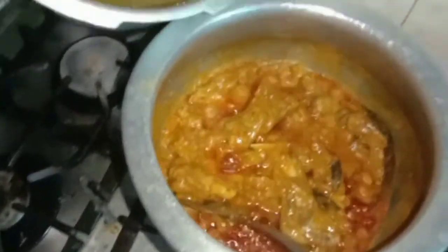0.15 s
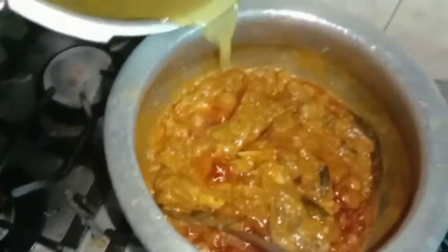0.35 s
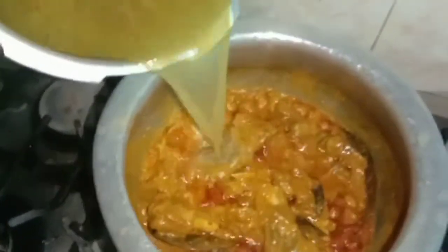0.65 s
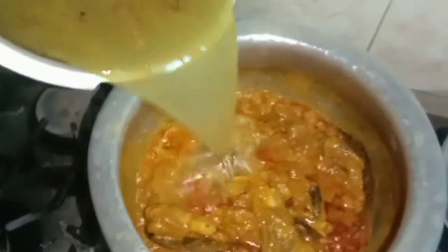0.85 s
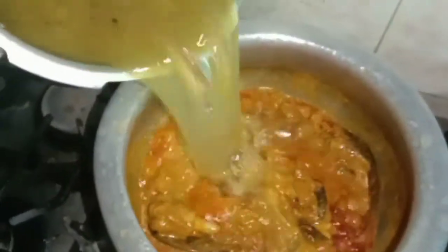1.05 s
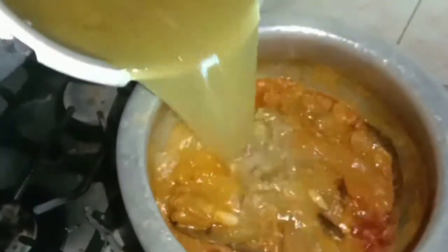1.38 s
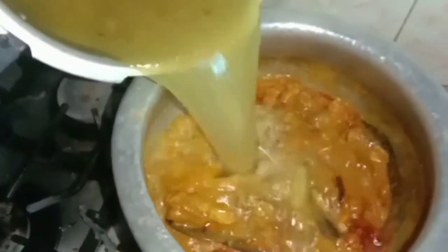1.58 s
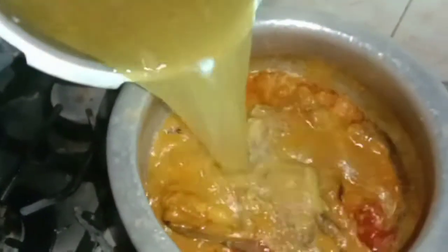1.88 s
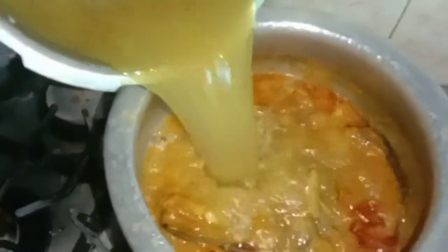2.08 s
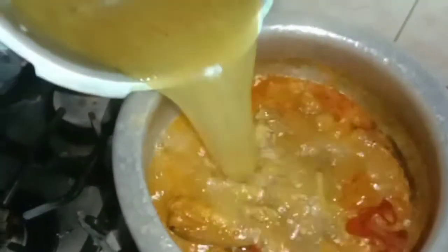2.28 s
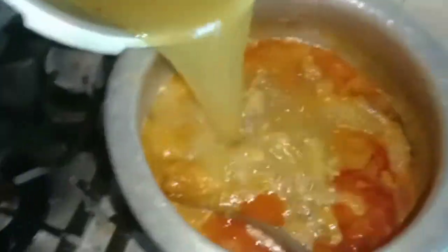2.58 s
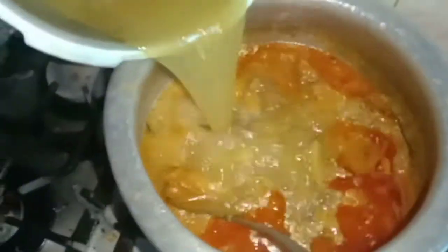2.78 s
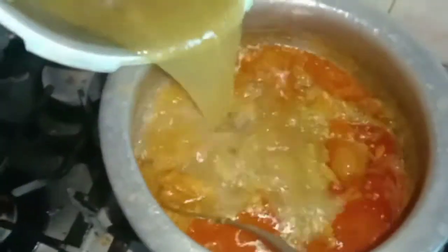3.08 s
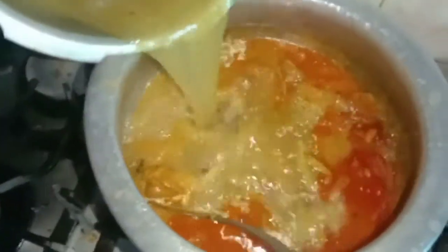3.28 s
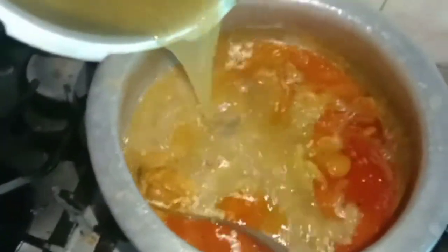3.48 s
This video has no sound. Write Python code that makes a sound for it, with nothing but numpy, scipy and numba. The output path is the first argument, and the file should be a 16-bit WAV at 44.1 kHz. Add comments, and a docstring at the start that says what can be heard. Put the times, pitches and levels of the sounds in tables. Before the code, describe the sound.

Broth pours into a metal pot of hot gravy, close to the microphone in a kitchen. It patters and sizzles, swells with popping bubbles, then eases off as something knocks against the cookware, which rings briefly.

```python
"""From the start, hot gravy sizzles in a metal pot close to the microphone; near 0.8 s broth begins to pour in.
Small bubbles, each a damped oscillator, patter and fizz, and pockets in the gravy open with falling tones.
After a second the stream swells; larger bubbles pop, and the air in the pot resonates, less as it fills. Soft
low rumbles come and go throughout. Near 3.5 s the pour eases off, and something knocks against the cookware,
whose metal rings in its natural modes."""
import sys
import numpy as np
from scipy import signal
from scipy.fft import rfft, irfft
from scipy.io import wavfile
from scipy.ndimage import uniform_filter1d
from numba import njit

SR = 44100
rng = np.random.default_rng(int(sys.argv[2]) if len(sys.argv) > 2 else 0)


def to_wav(s):
    """Save 16-bit WAV."""
    ch = np.atleast_2d(s).T  # columns
    pcm = np.round(np.clip(ch, -1, 1) * 32767)  # PCM
    wavfile.write(sys.argv[1], SR, pcm.astype(np.int16))


N = 160965
TIME = np.arange(N) / SR

# Levels are relative within each table.
# Spectrum of the kitchen noise (frequency [Hz], level [dB])
KITCHEN_SPECTRUM = [(15, -44), (25, -2), (107, 6), (156, -3.5), (201, 2.5), (335, -4), (509, -0.5),
                    (741, -4), (900, -8.5), (1170, -60), (1980, -120)]
# Low rumbles (centre time [s], duration [s], level [dB])
RUMBLES = [(0.01, 0.064, -47.5), (0.184, 0.16, -45.5), (1.727, 0.034, -47), (1.869, 0.12, -44),
           (2.82, 0.13, -48.5), (2.992, 0.32, -51.5), (3.538, 0.063, -36.5)]
# Air modes of the pot (frequency [Hz], bandwidth [Hz], level [dB])
AIR_MODES = [(519, 66, -60.5), (976, 73, -59.5), (1189, 55, -50.5), (1427, 230, -59)]
# Gulps that swell one air mode (centre time [s], duration [s], frequency [Hz], level [dB])
GULPS = [(0.257, 0.15, 503, -45.5), (0.358, 0.12, 220, -53), (0.467, 0.089, 527, -47.5),
         (0.749, 0.049, 1157, -39.5), (1.315, 0.046, 975, -39), (1.482, 0.094, 517, -43),
         (1.526, 0.065, 983, -35), (1.803, 0.048, 1180, -44), (1.613, 0.045, 972, -39),
         (2.084, 0.044, 519, -40.5), (2.213, 0.13, 530, -46.5), (2.047, 0.1, 994, -42),
         (2.212, 0.1, 1190, -44.5), (2.409, 0.041, 993, -40.5), (2.946, .06, 1223, -45.5),
         (3.38, 0.1, 1250, -47)]
# Pockets opening in the gravy (time [s], decay [s], start pitch [Hz], end pitch [Hz], level [dB])
GLOOPS = [(0.311, .028, 1770, 1520, -25), (.335, .018, 1380, 1280, -29), (.456, .018, 2480, 2080, -32),
          (0.868, 0.026, 2520, 1950, -27)]
# Single bubbles (time [s], level [dB], frequency [Hz])
POPS = [(0.1359, -12, 3100), (0.373, -20, 2800), (0.6237, -9.5, 5630), (0.752, -9.5, 3130),
        (0.914, -16.5, 2720), (1.0007, -8.5, 3240), (1.0934, -11, 5470), (1.2309, -6.5, 3340),
        (1.302, -4, 5700), (1.325, -2.5, 5750), (1.3515, -7, 5470), (1.4633, -7.5, 5750),
        (1.6355, -5, 5900), (1.7125, -8.5, 3350), (1.8646, -14, 2600), (1.9314, -6.5, 6230),
        (1.9654, -7, 2790), (1.9944, -8.5, 3340), (2.0792, -9, 3240), (2.1053, -12, 3220),
        (2.1885, -14, 3330), (2.2191, -3.5, 6250), (2.2667, -11, 3160), (2.3781, -2, 6040),
        (2.3855, -3, 6470), (2.4492, -11, 2670), (2.4772, -12, 2760), (2.5645, -10.5, 3300),
        (2.602, -10, 6070), (2.6957, -4, 3410), (2.8647, -13, 2930), (2.8987, -13, 2745),
        (3.056, -13, 2520), (3.071, -10, 3100), (3.0978, -11.5, 2750), (3.212, -11.5, 3110),
        (3.2526, -16, 2840), (3.4124, -8, 5930), (3.4183, -10.5, 2860), (3.493, -5, 5170)]  # small bubbles and spits
PLOPS = [(.234, -32, 1270), (.733, -31.5, 1500), (.882, -27.5, 2020), (2.093, -28, 2110),
         (2.378, -23.5, 2114), (2.441, -27, 1864)]  # larger bubbles
SPRAY_TICKS = [(0.188, -18, 13800), (1.4623, -15, 14500), (1.5444, -17, 13900), (1.565, -4.5, 13900),
               (3.0555, -12.5, 13300)]
# Wet splats of gravy (time [s], level [dB], decay [s], share of fine spray [dB])
SPLATS = [(0.184, -30, 0.009, 6), (.311, -26, 0.011, -20), (.752, -25, 0.012, -16), (1.279, -23, 0.0045, 3),
          (1.463, -22, .004, -7), (1.635, -25, .005, -10), (1.9075, -18.5, 0.0035, -9),
          (2.217, -31, 0.0076, -12), (2.378, -12.5, 0.003, -16), (2.3865, -16, 0.004, -16),
          (2.710, -22.5, 0.008, -16)]
# The knock and its rebounds (time [s], level [dB])
IMPACTS = [(3.5452, -2), (3.547, 0.5), (3.552, 0.5), (3.561, -8)]
# Modes of the cookware (frequency [Hz], level [dB], 60 dB decay time [s])
METAL_MODES = [(94, -34.5, 0.78), (136, -32.5, 0.47), (184, -28.5, 0.34), (219.6, -23, 0.29),
               (510, -28.5, 0.74), (684, -29, 0.26), (729, -19, 0.12), (1020, -26, 0.41), (1066, -19, 0.17),
               (1138, -23, 0.19), (1265, -24, 0.17), (1387, -29, 0.27), (1624, -28, 0.16),
               (3310, -32.5, .25), (4136, -27, 0.26), (5010, -29, 0.95), (5502, -48, 0.31),
               (6330, -38.5, 0.76), (7900, -44.5, 0.64)]
# Spectra of the transients (frequency [Hz], level [dB])
SPLAT_SPECTRUM = [(400, -30), (1600, -8), (2300, -13), (3200, 11.5), (4300, -2), (5600, 13), (6600, 5),
                  (8500, -11.5), (15000, -29)]
CLUNK_SPECTRUM = [(350, -24), (720, 2), (1150, -6), (1600, -15), (4000, -19), (5600, -9), (9000, -34.5)]
RATTLE_SPECTRUM = [(40, -38), (70, -18), (95, -20), (140, -3), (220, -10), (300, -12), (520, -4.5),
                   (750, -3.5), (880, -18), (1080, -3.5), (1350, -11), (1480, -15), (1620, -10.5),
                   (1900, -17.5), (2900, -18.5), (4200, -25.5), (5500, -18), (7000, -41)]
# Spectra of the bubble swarms (frequency [Hz], level [dB])
BURBLE_SPECTRUM = [(300, -16), (750, -16), (950, -1), (1200, 0), (1480, 3.5), (1700, -16), (1950, 1),
                   (2500, -23.5)]
SPLASH_SPECTRUM = [(900, -20), (1600, -10.5), (2100, -1.5), (2500, -3.5), (3300, -12), (4300, -5.5),
                   (5000, 1), (7000, -37)]
PATTER_SPECTRUM = [(1200, -21), (2100, -42), (2350, -4), (2620, 2.5), (2900, -3.5), (3200, 0), (3600, -4.5),
                   (3950, -3.5), (4300, -13.5), (5200, -30)]
SIZZLE_SPECTRUM = [(2500, -35), (4300, -7), (4900, -5), (5500, 0), (6200, -0.5), (7000, -4.5), (8000, -16),
                   (9500, -34), (13000, -29)]
FIZZ_SPECTRUM = [(4000, -17), (8000, -6), (9400, -12), (11000, -7.5), (13000, -3), (14500, 0.5), (16000, 1)]
# Envelopes of the low burble and of the stream's splash (time [s], level [dB])
BURBLE_LEVELS = [(0, -42.5), (.6, -48), (.75, -49.5), (1.0, -43.5), (1.3, -40), (1.42, -41.5), (1.6, -46),
                 (1.7, -37), (1.9, -50.5), (2.03, -41.5), (2.3, -45.5), (2.8, -46.5), (3.4, -44.5)]
SPLASH_LEVELS = [(0, -58), (.6, -51), (.9, -49), (1.1, -37), (1.3, -31), (1.45, -43.5), (1.7, -39.5),
                 (1.85, -39.5), (2.05, -37), (2.4, -42), (2.7, -44), (3.1, -42.5), (3.3, -61.5),
                 (3.53, -43)]
# Activity in the pot (time [s], patter level [dB], sizzle level [dB], fizz level [dB])
ACTIVITY = [(0.0, -36.5, -37.5, -38), (0.12, -35, -34, -39), (0.55, -38, -37, -42), (0.59, -59, -46.5, -42),
            (0.64, -37.5, -28.5, -36.5), (0.73, -36, -36.5, -37.5), (0.79, -34, -32, -38.5),
            (0.89, -33.5, -34.5, -39), (1.1, -28, -25, -29.5), (1.15, -30.5, -35, -33.5),
            (1.32, -23, -22.5, -30.5), (1.48, -37, -31.5, -34), (1.53, -28.5, -29.5, -35),
            (1.57, -27, -26, -35), (1.65, -26, -27, -32.5), (1.88, -32, -32.5, -31.5),
            (1.91, -28, -31, -34), (2.36, -30, -30.5, -34), (2.4, -32, -34, -33),
            (2.44, -29.5, -34.5, -36.5), (2.55, -30, -34, -39), (2.63, -26, -31.5, -35),
            (3.02, -30.5, -32.5, -37.5), (3.07, -29.5, -28.5, -35), (3.13, -34, -33.5, -38),
            (3.19, -26.5, -31, -34), (3.26, -39.5, -46, -47.5), (3.5, -26, -28.5, -31),
            (3.53, -19.5, -29.5, -29.5)]
# Resonance of the patter, sinking as the pot fills (time [s], frequency [Hz], bandwidth [Hz])
PATTER_RESONANCE = [(0.9, 3350, 1300), (1.2, 3190, 605), (1.75, 3250, 584), (2.3, 3050, 1140),
                    (2.7, 3080, 1200), (3.5, 2650, 1200)]


def amp(db):
    """Amplitude ratio: a factor of ten for every 20 dB."""
    return 10 ** (np.asarray(db) / 20)


def unit(x):
    """Normalisation to an rms of 1."""
    return x / np.sqrt(np.mean(x ** 2) + 1e-20)


def add(mix, start_s, sound):
    """Superposition of a delayed sound on the mix."""
    part = mix[max(round(start_s * SR), 0):][:len(sound)]
    part += sound[:len(part)]


def envelope(table, column=1):
    """Amplitude envelope, interpolated linearly in decibels."""
    rows = np.array(table)
    return amp(np.interp(TIME, rows[:, 0], rows[:, column]))


def swell(centre_s, length_s):
    """Gaussian envelope, length_s wide between its 1/e points."""
    return np.exp(-(2 * (TIME - centre_s) / length_s) ** 2)


def colour(x, spectrum, size=2048):
    """Minimum-phase filter: the phase follows from the Hilbert transform of the log magnitude."""
    hz, db = np.transpose(spectrum)
    f = abs(np.fft.fftfreq(size, 1 / SR))
    gain = amp(np.interp(np.log(f + 1), np.log(hz + 1), db))
    bass_rolloff = np.minimum((f + 1) / (hz[0] + 1), 1)
    log_response = np.conj(signal.hilbert(np.log(gain * bass_rolloff + 1e-5)))
    taps = np.fft.ifft(np.exp(log_response)).real
    return signal.oaconvolve(x, taps)[:len(x)]


def noise(samples, spectrum, size=2048):
    """Filtered white noise takes on the spectrum of its filter; rms 1."""
    return unit(colour(rng.standard_normal(samples), spectrum, size))


def resonance(hz, width_hz):
    """A resonance driven by turbulence responds with a narrow band of noise; rms 1."""
    f = np.fft.rfftfreq(N, 1 / SR)
    return unit(irfft(rfft(rng.standard_normal(N)) / (1 + ((f - hz) / width_hz * 2) ** 4), N))


@njit
def leaky_sum(x, pole):
    """Leaky integration: a one-pole low-pass whose memory varies with time."""
    out = x.copy()
    for i in range(1, len(x)):
        out[i] += pole[i] * out[i - 1]
    return out


def moving_resonance(x, hz, width_hz):
    """Heterodyne resonator of constant noise power: shift down, low-pass, shift back."""
    carrier = np.exp(2j * np.pi * np.cumsum(hz) / SR)
    pole = np.exp(-np.pi * width_hz / SR)
    return (carrier * leaky_sum(np.sqrt(1 - pole ** 2) * x / carrier, pole)).real


def reflections(x, t60, wet_db, gap_s, count=8):
    """Echo paths depend on source position: moving splashes crossfade between impulse responses."""
    t, wet = TIME[:SR // 4], np.zeros(N)
    position = TIME / 0.02  # the next pattern every 20 ms
    for k in range(count):
        share = np.cos(np.pi / 2 * np.minimum(abs((position - k) % count - 1), 1))
        tail = rng.standard_normal(len(t)) * amp(-60 * t / t60) * (t > gap_s)
        wet += signal.oaconvolve(x * share, tail / np.linalg.norm(tail))[:N]
    return (x + amp(wet_db) * wet) / np.sqrt(1 + amp(wet_db) ** 2)


def in_pot(x, pot_db, room_db):
    """Reverberation in series: first between the pot walls, then in the kitchen."""
    pot = reflections(x, t60=0.022, wet_db=pot_db, gap_s=0.001)
    return reflections(pot, t60=0.19, wet_db=room_db, gap_s=0.006)


def background():
    """Steady kitchen noise, with rumbles formed by amplitude modulation of a low noise band."""
    swells = sum(amp(db) * swell(s, length) for s, length, db in RUMBLES)
    rumble = swells * resonance(hz=118, width_hz=95)
    return rumble + amp(-55.5) * noise(N, KITCHEN_SPECTRUM, size=8192)


def pot_air():
    """Cavity resonance: the burble drives the air modes of the pot, and each gulp swells one mode."""
    drive = unit(envelope(BURBLE_LEVELS)) ** 0.81  # follows the burble with a reduced range
    damped_from_s, fade_db_per_s = 1.83, 5.5  # the rising liquid damps the modes
    damping = amp(-fade_db_per_s * np.maximum(TIME - damped_from_s, 0))
    modes = sum(amp(db) * resonance(hz, width) for hz, width, db in AIR_MODES)
    gulps = sum(amp(db) * swell(s, length) * resonance(hz, width_hz=85) for s, length, hz, db in GULPS)
    return drive * damping * modes + gulps


def gloops():
    """Pockets opening in thick gravy ring as damped oscillators whose pitch relaxes downward."""
    out, t = np.zeros(N), TIME[:SR // 4]
    attack = np.minimum(t / 0.005, 1)
    for s, decay, start_hz, end_hz, db in GLOOPS:
        fade = np.exp(-t / decay)
        hz = end_hz + (start_hz - end_hz) * fade
        flutter = 1 + 0.3 * unit(uniform_filter1d(rng.standard_normal(len(t)), size=140))
        tone = unit(flutter * np.sin(2 * np.pi * np.cumsum(hz) / SR))
        add(out, s, amp(db) * tone * attack * fade)
    return in_pot(out, pot_db=-14, room_db=-11)


def bubble(hz, cycles, glide):
    """Damped oscillation of a bubble: every `cycles` periods it decays by 1/e and sharpens by `glide`."""
    age = np.arange(0, 7, hz / cycles / SR)  # in decay times
    phase = 2 * np.pi * cycles * (age + glide * age * age / 2)
    ring = (1 - np.exp(-4 * age)) * np.exp(-age) * np.sin(phase)
    return ring / abs(ring).max()


def pops_and_splats():
    """Transients above the swarms: single bubbles ring freely, and splats decay as broadband noise."""
    out, t = np.zeros(N), TIME[:SR // 6]
    for s, db, hz in POPS:
        add(out, s, amp(db - 5.5) * bubble(hz, cycles=5.4, glide=0.0089))
    for s, db, hz in PLOPS:
        add(out, s, amp(db - 1) * bubble(hz, cycles=13.7, glide=0.0017))
    for s, db, hz in SPRAY_TICKS:
        add(out, s, amp(db + 3) * bubble(hz, cycles=4.8, glide=0.0072))
    for s, db, decay, spray_db in SPLATS:
        splat = noise(len(t), SPLAT_SPECTRUM)
        spray = amp(spray_db) * noise(len(t), FIZZ_SPECTRUM)
        add(out, s, amp(db) * (splat + spray) * np.exp(-t / decay))
    return in_pot(out, pot_db=-10, room_db=-9)


def knock():
    """Impact excitation: the first blow rings the metal's modes; every contact clunks and rattles."""
    out, t = np.zeros(N), TIME[:SR // 2]
    attack = np.minimum(t / 0.0004, 1)
    ring = sum(amp(db - 60 * t / t60) * np.sin(2 * np.pi * (hz * t + rng.random()))
               for hz, db, t60 in METAL_MODES)
    add(out, IMPACTS[0][0], amp(2.5) * attack * ring)
    rattle_t60, clunk_t60 = 0.57, 0.15
    for s, db in IMPACTS:
        rattle = noise(len(t), RATTLE_SPECTRUM) * amp(-22 - 60 * t / rattle_t60)
        clunk = noise(len(t), CLUNK_SPECTRUM) * amp(-23 - 60 * t / clunk_t60)
        add(out, s, amp(db) * attack * (rattle + clunk))
    return out


def swarm(spectrum, per_s, band_hz, cycles, spread_db, clump_db, count=32):
    """A Poisson process of bubbles of many sizes; a shared random gain groups them into clumps."""
    drift = uniform_filter1d(uniform_filter1d(rng.standard_normal(N), size=500), size=300)
    clumps = amp(clump_db * unit(drift))
    strengths = amp(spread_db * np.minimum(rng.exponential(1, N), 3.5)) * rng.choice([-1, 1], N)
    impulses = strengths * clumps * (rng.random(N) < per_s / SR)
    size_class = rng.integers(0, count, N)
    out = np.zeros(N)
    for k, hz in enumerate(np.linspace(*band_hz, count)):
        ring = bubble(hz, cycles, glide=0.024)
        out += signal.oaconvolve(impulses * (size_class == k), ring / np.linalg.norm(ring))[:N]
    return colour(out, spectrum)


def stream():
    """Smaller bubbles resonate higher: five swarms span the burble under the stream to the finest fizz."""
    burble = swarm(BURBLE_SPECTRUM, 700, (700, 1978), cycles=7.6, spread_db=6.5, clump_db=-2.7)
    splash = swarm(SPLASH_SPECTRUM, 1400, (1466, 5420), cycles=3, spread_db=1, clump_db=4.5)
    patter = swarm(PATTER_SPECTRUM, 520, (2240, 4047), cycles=2.76, spread_db=3, clump_db=0.5)
    sizzle = swarm(SIZZLE_SPECTRUM, 1600, (4480, 8950), cycles=2.46, spread_db=4, clump_db=3)
    fizz = swarm(FIZZ_SPECTRUM, 6000, (8150, 16100), cycles=1.2, spread_db=7, clump_db=2.5)
    s, peak_hz, width_hz = np.transpose(PATTER_RESONANCE)
    patter = moving_resonance(patter, np.interp(TIME, s, peak_hz), np.interp(TIME, s, width_hz))
    swarms = (amp(-1.5) * envelope(BURBLE_LEVELS) * unit(burble)
              + amp(2.5) * envelope(SPLASH_LEVELS) * unit(splash)
              + amp(-2.5) * envelope(ACTIVITY, column=1) * unit(patter)
              + amp(0.36) * envelope(ACTIVITY, column=2) * unit(sizzle)
              + amp(2.3) * envelope(ACTIVITY, column=3) * unit(fizz))
    ease_from_s, ease_db_per_s = 3.45, 102  # the pour eases off
    easing = amp(-ease_db_per_s * np.maximum(TIME - ease_from_s, 0))
    return in_pot(swarms * easing, pot_db=-4, room_db=-3.5)


def scene():
    """Linear superposition of all sources at one close microphone."""
    return (background() + pot_air() + gloops() + pops_and_splats() + knock() + stream())[None]


def record(dry):
    """Band limiting: a high-pass removes the deep bass, and a steep low-pass removes the highest treble."""
    highpass = signal.butter(2, 55, "highpass", fs=SR, output="sos")
    lowpass = signal.firwin(401, 15700, window=("kaiser", 8), fs=SR)
    return signal.oaconvolve(signal.sosfilt(highpass, dry), lowpass[None], "same")


dry = scene()
out = record(dry)
to_wav(out)
```